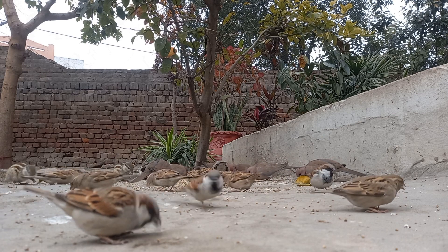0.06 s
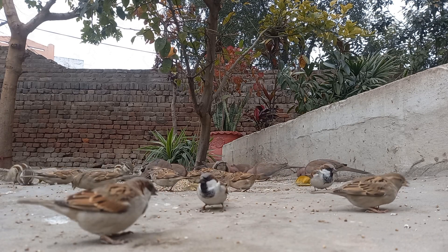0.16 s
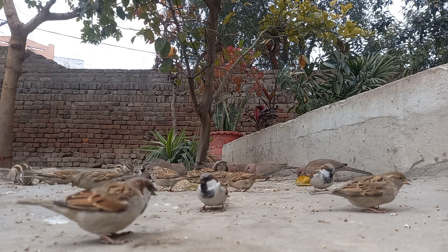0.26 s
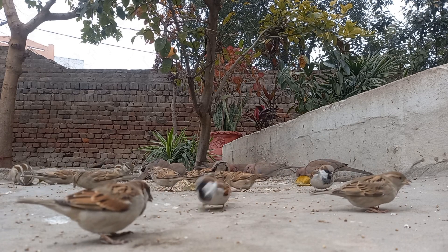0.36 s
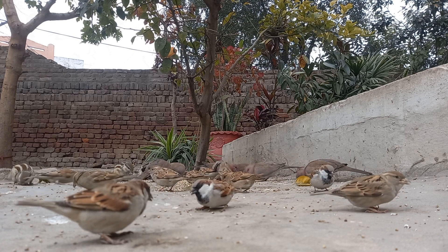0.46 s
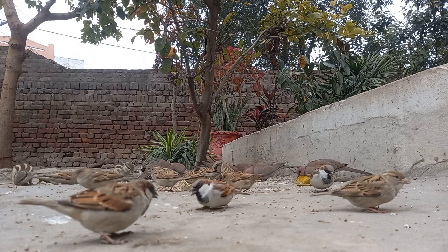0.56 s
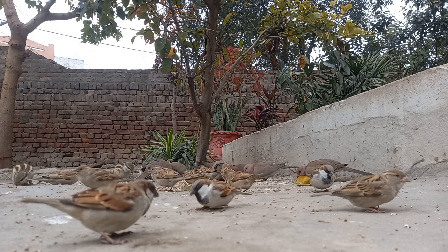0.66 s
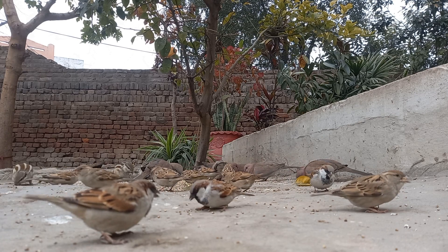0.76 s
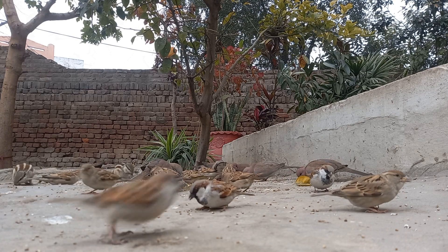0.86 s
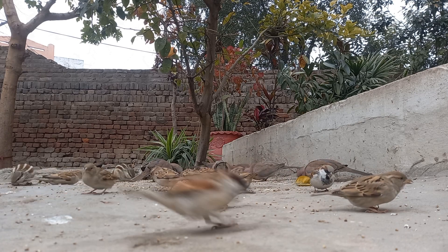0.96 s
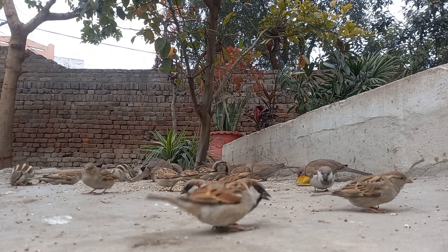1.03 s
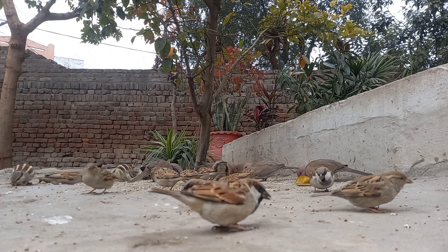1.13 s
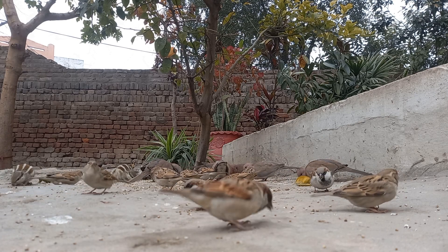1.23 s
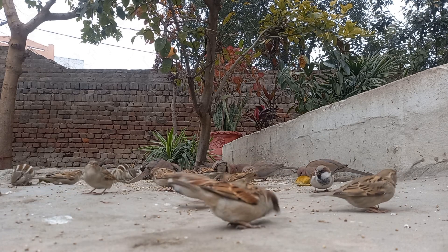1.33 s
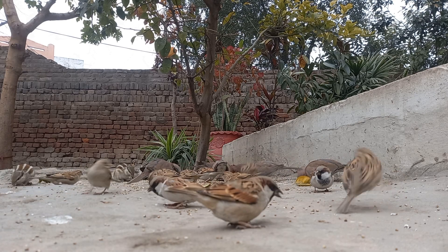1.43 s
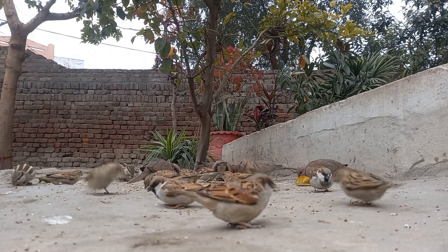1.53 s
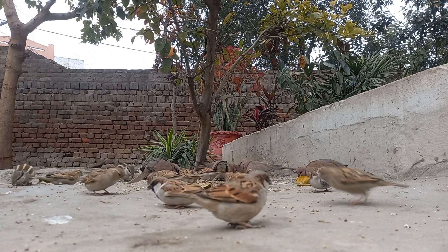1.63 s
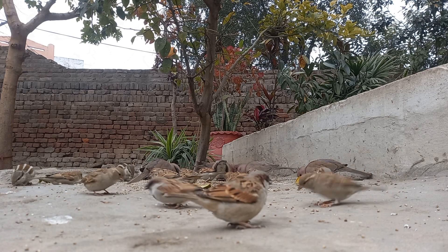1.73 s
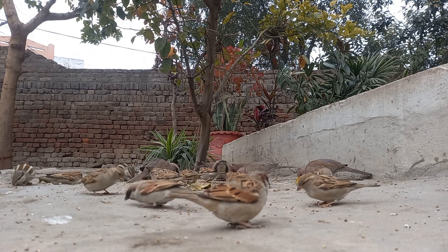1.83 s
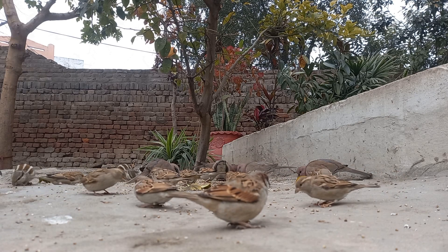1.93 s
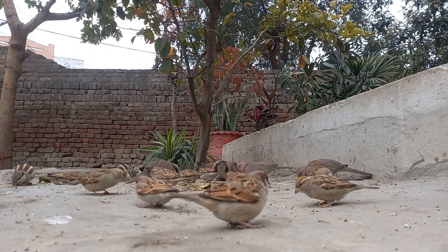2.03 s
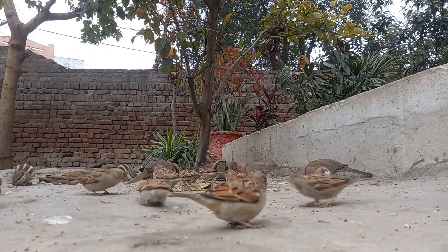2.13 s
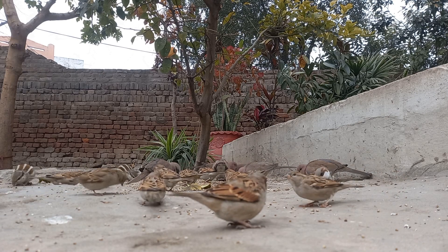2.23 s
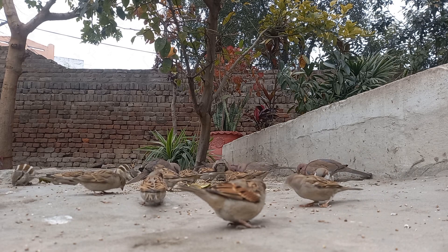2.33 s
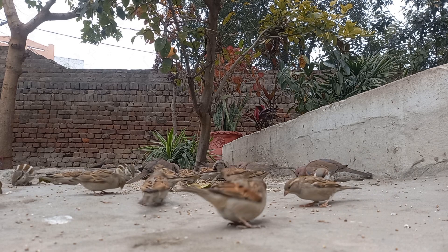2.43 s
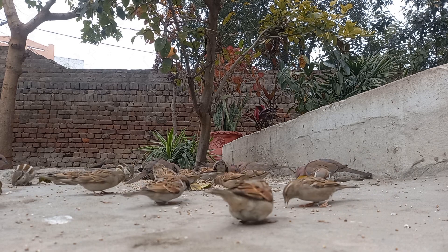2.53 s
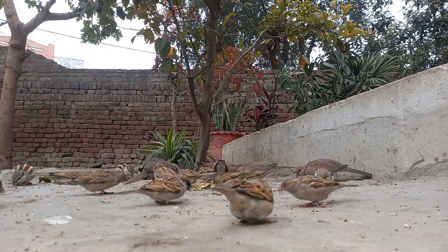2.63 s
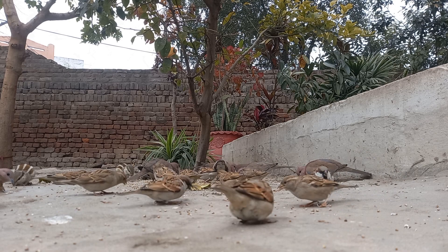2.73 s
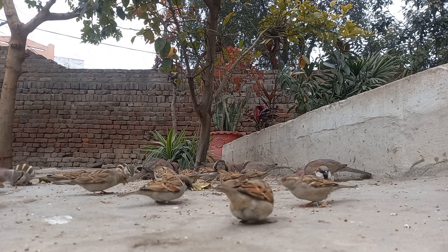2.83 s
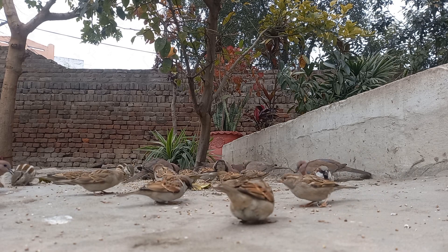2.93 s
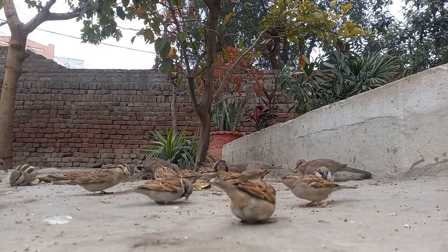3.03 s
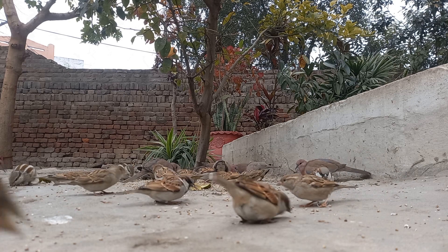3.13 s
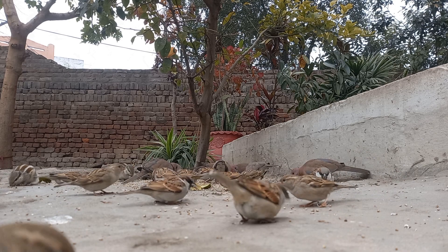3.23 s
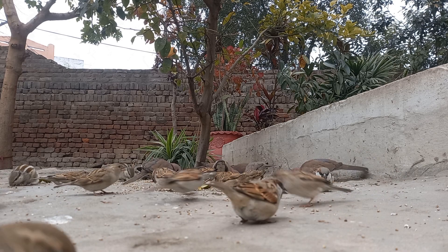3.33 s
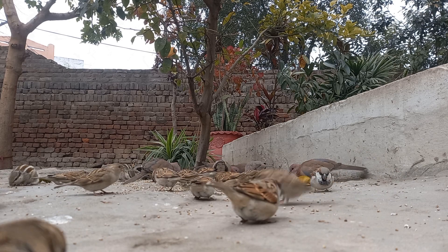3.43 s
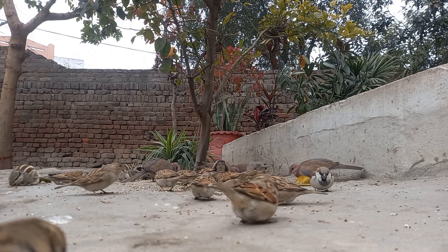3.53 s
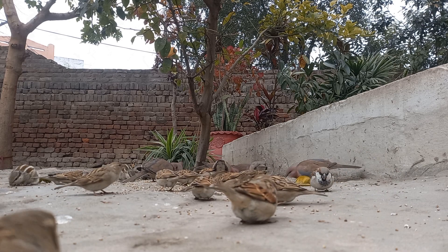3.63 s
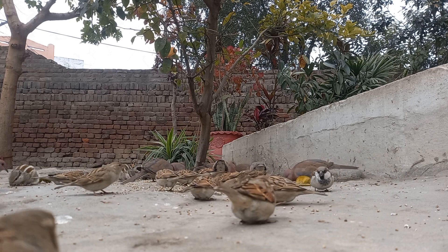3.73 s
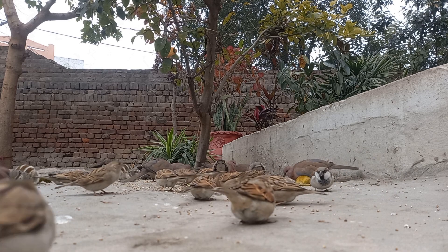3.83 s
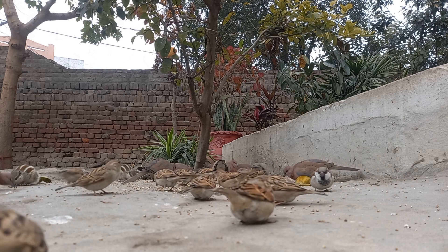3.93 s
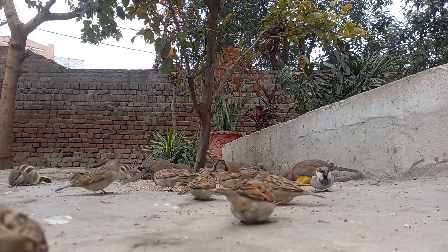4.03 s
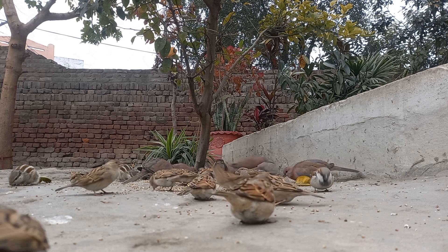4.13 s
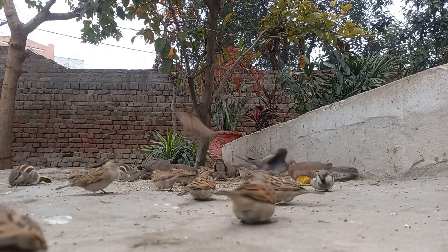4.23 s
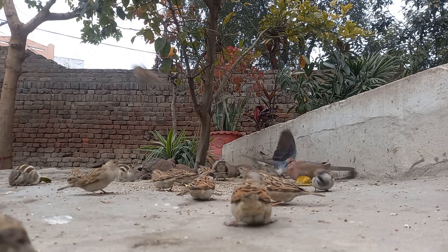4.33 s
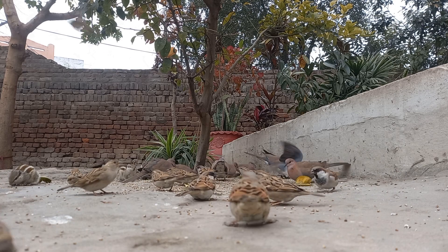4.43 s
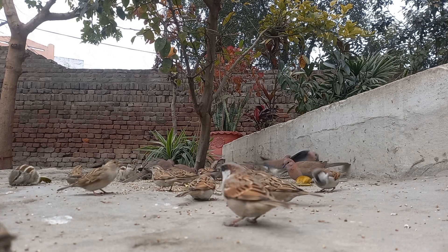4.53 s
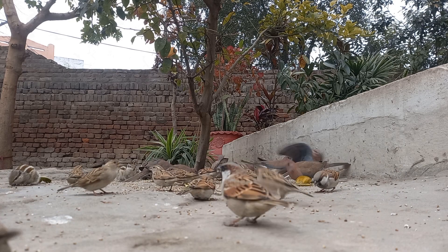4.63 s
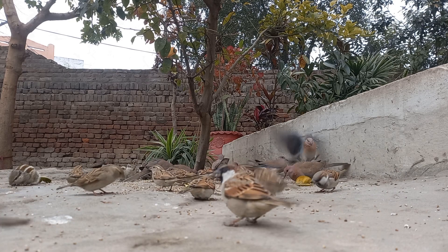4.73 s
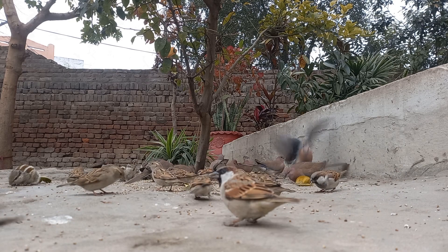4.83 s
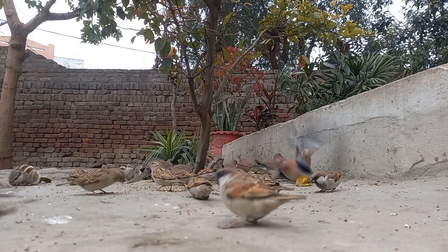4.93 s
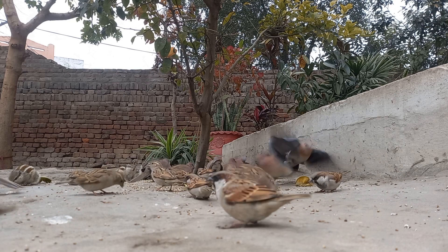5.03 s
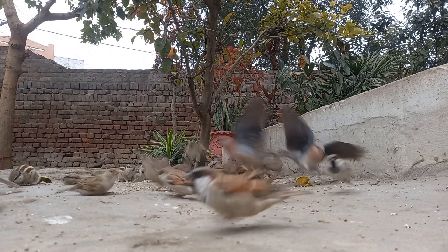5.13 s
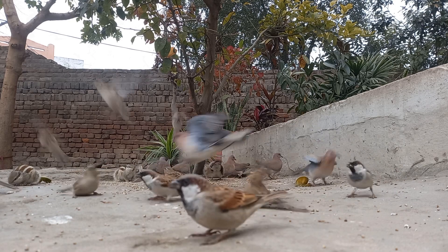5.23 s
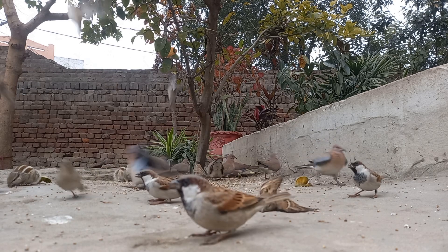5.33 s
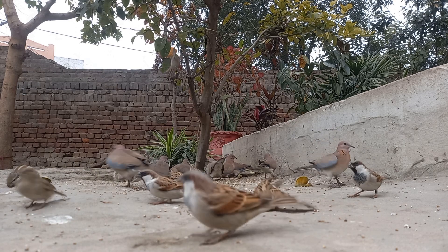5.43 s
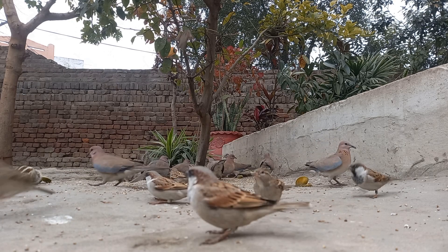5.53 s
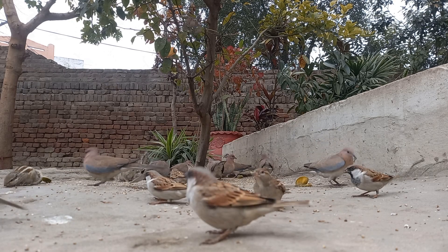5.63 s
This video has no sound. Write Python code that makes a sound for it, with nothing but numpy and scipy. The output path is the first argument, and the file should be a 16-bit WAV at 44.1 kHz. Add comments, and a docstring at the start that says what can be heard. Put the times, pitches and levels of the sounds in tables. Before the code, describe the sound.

Sparrows peck seed on a concrete courtyard, close to a microphone on the ground and mostly to the left. Sharp, irregular beak clicks and husk cracks run throughout over faint outdoor air. Brief chirps come at the start and around 1.4 seconds, with faint coos and raspy bird cries lightly echoing off the walls. Soft distant swishes drift by during the first two seconds and again from about 2.5 to 3.7. A larger bird gives a rising nasal call at 2.1 seconds, then a quick cluck. The pecking thins and claws scratch grit around 4 seconds. From 4.3 seconds doves take off nearby: rapid wingbeats clap and thump, feathers rustle, and gusts buffet the microphone with a low rumble. A coo and short low grunt come near 4.9 seconds. The flapping is loudest from 5.1 to 5.4, scattering seed, and continues to the end at about 5.6.

```python
"""A concrete courtyard, microphone on the ground. Sparrows peck seed right beside it: beak clicks,
cracking husks, claws on grit. Birds chirp, coo and rasp in the trees, gliding tones thrown back by
the walls, and a few distant swishes drift over. Near the end doves take off close by: wingbeats clap
and buffet the microphone, feathers rustle and seed scatters."""
import sys
import numpy as np
from scipy import signal
from scipy.fft import rfft, irfft, next_fast_len
from scipy.io import wavfile
from scipy.ndimage import uniform_filter1d, map_coordinates

SR = 44100
rng = np.random.default_rng(int(sys.argv[2]) if len(sys.argv) > 2 else 0)


def to_wav(sig):
    """Store sig (one row per channel, or 1-D mono) as 16-bit WAV at the path in sys.argv[1].

    Samples outside -1..1 are clipped; the rate is SR.
    """
    pcm = np.clip(np.atleast_2d(sig), -1, 1) * 32767
    pcm = np.round(pcm).astype(np.int16)
    wavfile.write(sys.argv[1], SR, pcm.T)  # frames by channels


N = 249606
TIME = np.arange(N) / SR
FADE_DB = 20  # drop over a swell's rise or fall, or a call's fade

# outdoor air: time_s, level_db
AIR_LEVELS = [(0, -59.5), (0.3, -60), (0.9, -59), (2.0, -57), (2.3, -57), (3.2, -62), (4.0, -63.5),
              (5.6, -47.5)]
# air puffs on the microphone: peak_s, rise_s, fall_s, level_db
AIR_PUFFS = [(1.91, 0.1, 0.16, -47), (2.34, 0.072, 0.047, -60.5), (3.56, 0.095, 0.069, -49)]
# distant swishes: peak_s, rise_s, fall_s, level_db, drift_octaves_per_s
FAR_SWISHES = [(0.302, 0.19, 0.17, -39, -.3), (0.93, 0.32, 0.17, -45.5, -.3), (1.61, 0.15, 0.13, -37.5, -1),
               (2.831, 0.39, 0.34, -38, .35), (3.504, 0.27, .23, -34, .15),
               (3.03, 0.072, 0.21, -47.5, 0.27)]
# resonances, one list per swish: centre_hz, width_hz, gain_db
SWISH_RESONANCES = [
    [(302, 280, 17), (845, 365, 19.5), (1710, 1760, 8.5), (5960, 250, -12)],
    [(597, 485, 6), (1700, 580, 5), (5700, 860, -0.5)],
    [(1360, 170, 12), (2400, 1700, 11), (4220, 2100, 17.5), (5670, 840, 14.5)],
    [(1560, 280, 1), (2930, 1650, 24), (3620, 340, 13), (4650, 2100, -13.5), (5730, 930, 17.5)],
    [(1610, 370, 6), (2260, 330, 16.5), (3180, 1150, 20.5), (4730, 350, 2), (5790, 990, 10)],
    [(2750, 400, -9), (4320, 1300, 5)],
]
# harsh cries: peak_s, rise_s, fall_s, level_db, pitch_hz, glide_hz_per_s, width_hz, left_db
CRIES = [(.165, 0.056, 0.12, -48, 2557, -7000, 650, 14), (.81, 0.095, 0.041, -50, 706, 400, 119, 7),
         (.94, .13, 0.16, -46, 768, -400, 149, 5), (1.62, 0.11, 0.084, -36.5, 1406, -1500, 172, 10.5),
         (1.74, .14, 0.11, -47.5, 4290, 3499, 424, 8)]
# harmonics, one list per cry, fundamental first: gain_db
CRY_HARMONICS = [
    [0, -8],
    [-12, 1, -5, -0.5, -7],
    [1, 1, -14, -2.5, -11, -16, -3.5],
    [-8, -5, 2.5, -8],
    [0],
]
# dove coos: start_s, length_s, level_db, first_hz, last_hz, left_db
DOVE_COOS = [(0.435, 0.26, -55.5, 811, 722, 6), (0.779, 0.21, -45.5, 640, 646, -17),
             (0.999, 0.26, -56.5, 625, 590, -18), (1.327, 0.18, -64.5, 590, 591, -21),
             (2.731, 0.11, -56, 414, 410, 2), (2.887, 0.11, -61.5, 417, 423, 9),
             (3.646, 0.3, -58, 373, 377, -7), (3.887, 0.058, -60, 421, 448, -7),
             (3.931, 0.081, -63, 679.5, 677, -18.5), (4.67, 0.2, -45.5, 463.7, 457, 2),
             (4.861, 0.2, -35, 440.2, 439.5, -1.5)]
# chirps: start_s, rise_s, fade_s, level_db, first_hz, last_hz, glide_s, octave_db, roughness, left_db
SPARROW_CHIRPS = [(0.123, 0.014, 0.055, -40.5, 3330, 1687, 0.089, -1.5, 0.01, -3),
                  (.18, 0.012, 0.23, -46, 2200, 1883, 0.024, -47, 0.022, 24),
                  (1.325, 0.012, 0.011, -41.5, 2700, 4770, 0.008, -27, 0.07, 12),
                  (1.359, 0.044, 0.027, -30, 4850, 2710, .031, -25, 0.01, 3),
                  (1.42, 0.032, 0.053, -40, 3015, 3270, 0.0554, -14, 0.04, 10),
                  (2.25, 0.037, 0.97, -55, 3800, 3360, 0.33, -46, .012, 16)]
# larger bird's rising call: time_s, pitch_hz, level_db
NASAL_CONTOUR = [(2.064, 855, -49.5), (2.099, 1049, -41), (2.137, 1139, -28), (2.156, 1120, -35),
                 (2.195, 1197, -38.5), (2.246, 1260, -52.5), (2.379, 1250, -65)]
# its falling cluck: start_s, rise_s, fade_s, level_db, first_hz, last_hz, glide_s
BIRD_CLUCKS = [(2.449, 0.004, 0.0096, -29, 1114, 686, 0.0065)]
# claws on concrete: peak_s, rise_s, fall_s, level_db
CLAW_SCRATCHES = [(0.1, 0.0024, 0.027, -37.5), (1.848, 0.075, 0.072, -42), (3.93, 0.013, 0.038, -53.5),
                  (4.057, 0.017, 0.025, -46.5), (4.096, 0.019, 0.015, -46.5), (4.149, 0.014, 0.023, -46.5),
                  (4.198, 0.015, 0.023, -53), (4.264, 0.019, 0.016, -43)]
# seed blown by the wings: peak_s, rise_s, fall_s, level_db
SEED_SPRAYS = [(4.857, 0.013, 0.042, -36.5), (5.137, .022, 0.022, -22.5), (5.38, 0.03, 0.034, -40)]
# feather flurries: peak_s, rise_s, fall_s, hiss_db, rush_db
FEATHER_FLURRIES = [(4.266, 0.028, 0.097, -40, -52.5), (4.328, 0.053, 0.35, -40, -29.5),
                    (4.489, 0.13, 1, -49, -40), (4.794, 0.025, 0.13, -36.5, -35.5),
                    (4.858, 0.016, 0.24, -37.5, -35.5), (5.021, 0.1, 0.43, -31, -35),
                    (5.131, 0.0078, 0.014, -23, -36.5), (5.14, 0.0048, 0.041, -26.5, -29),
                    (5.33, 0.26, 0.41, -33.5, -27)]
# hollow bumps, and a dove's short low grunt (last row): start_s, level_db, pitch_hz, width_hz
BUMPS_AND_GRUNT = [(2.009, -41, 1300, 200), (2.323, -35, 1320, 400), (2.329, -42, 856, 300),
                   (3.244, -37.5, 910, 500), (4.921, -15, 432, 46)]
# dove wing strokes: time_s, clap_db, clap_hz, thump_db, gust_db
WING_STROKES = [(4.276, -25.5, 734, -31.5, -20.5), (4.318, -23, 604, -17, -14.5),
                (4.324, -17, 930, -30.5, -35), (4.359, -24, 740, -19, -19), (4.368, -27.5, 1080, -26, -46),
                (4.401, -21, 686, -14.5, -19), (4.445, -29, 640, -26, -18), (4.488, -23.5, 500, -23, -16),
                (4.531, -24, 450, -16, -18), (4.572, -32, 430, -41, -18.5), (4.618, -29, 470, -28, -19),
                (4.665, -39, 710, -27, -24.5), (4.708, -32, 450, -27, -25.5), (4.754, -31.5, 477, -27, -26),
                (4.784, -17.5, 1240, -21, -23.5), (4.858, -22, 910, -33, -24.5),
                (4.878, -17.5, 1560, -39, -21), (4.955, -20, 450, -20.5, -42.5),
                (5.008, -22.5, 640, -23, -30), (5.1119, -5, 1173, -8.5, -42.5),
                (5.1398, -22, 624, -2.5, -13), (5.175, -21, 700, -19.5, -27),
                (5.2036, -12.5, 1080, -36, -24.5), (5.228, -22.5, 690, -28, -27),
                (5.249, -28, 950, -34.5, -30), (5.272, -15, 900, -23, -15), (5.313, -9, 633, -10.5, -17),
                (5.333, -28, 700, -22, -15.5), (5.358, -20, 700, -20, -14), (5.402, -18, 596, -13.5, -11.5),
                (5.444, -19.5, 560, -14, -21), (5.488, -46, 500, -16, -13), (5.532, -28.5, 500, -25, -13.5),
                (5.58, -38, 450, -22, -20), (5.624, -35, 448, -29, -16.5)]
# beak taps and cracking husks: start_s, level_db, centre_hz, edge_db
BEAK_TAPS = [(.171, -15.5, 5720, -17), (.191, -24, 5760, -45), (.251, -17, 6220, -58),
             (.279, -23.5, 5540, -50), (.2924, -15, 5600, -18), (.3203, -19, 5570, -8.5),
             (.3535, -23.5, 6350, -20), (.403, -19.5, 6060, -27), (.531, -32, 5240, -55),
             (.59, -35.5, 5400, -28.5), (.616, -29, 4600, -55), (.6324, -18.5, 4940, -60),
             (.65, -19.5, 5130, -30), (.662, -30, 5160, -50), (.7447, -5.5, 5340, -24),
             (.7986, -13.5, 5540, -46), (.9207, -19, 5900, -22), (.9743, -19, 4600, -60),
             (1.0549, -17.5, 5530, -21), (1.0955, -25, 5430, -55), (1.1933, -22.5, 5900, -57),
             (1.305, -19.5, 5820, -68), (1.389, -24.5, 5450, -35), (1.403, -20.5, 5330, -50),
             (1.471, -25.5, 4700, -54), (1.645, -19, 5470, -49), (1.5122, -17, 5620, -12),
             (1.6812, -12.5, 5000, -18), (1.6888, -5.5, 5460, -11), (1.689, -12.5, 2700, -50),
             (1.744, -29, 5200, -57), (1.758, -19, 5050, -62), (1.8166, -24.5, 5100, -58),
             (1.9039, -20, 5960, -52), (1.916, -21.5, 5000, -5), (1.9165, -7, 2750, -21),
             (2.0175, -22, 5450, -30), (2.043, -29.5, 6230, -39), (2.2284, -25, 5910, -52),
             (2.3099, -25, 2160, -21), (2.3303, -21.5, 2880, -50), (2.4478, -16, 5530, -14),
             (2.4627, -23, 6050, -45), (2.5433, -17.5, 4400, -6), (2.6497, -18, 5850, -39),
             (2.8205, -23.5, 4400, -61), (2.8734, -16.5, 6170, -55), (2.8826, -14, 3650, -60),
             (2.9183, -20, 5550, -10), (3.2362, -16.5, 3600, -58), (3.2423, -17, 3600, -55),
             (3.2469, -15.5, 4470, -8.5), (3.6625, -24.5, 5580, -30), (3.7678, -28.5, 5300, -62),
             (3.933, -33, 3270, -50), (3.948, -27, 4560, -55), (4.3178, -16.5, 2100, -38),
             (4.6484, -24.5, 4500, -54), (4.6617, -21, 5570, -50), (4.8569, -15, 2610, -9),
             (5.0099, -9, 5430, -43), (5.028, -11, 3800, -45), (5.0792, -11.5, 4100, -45),
             (5.1298, -7.5, 4130, -18), (5.1405, -21, 5780, -21), (5.3304, -4.5, 2990, -50),
             (5.331, -14, 5200, -50), (5.39, -20.5, 5810, -34), (5.453, -16.5, 5610, -49),
             (5.54, -23, 5620, -50), (5.574, -19, 5050, -48)]

# spectra: frequency_hz, gain_db
AIR_EQ = [(25, -37.5), (55, -10.5), (85, 11.5), (115, 3.5), (170, 3.5), (300, 1), (600, -1), (1000, -5),
          (2500, -2.5), (4500, -11), (6000, 3.5), (8000, -28.5), (16000, -12.5)]
GRIT_EQ = [(300, 1), (1000, 4), (3000, 4), (5800, 17), (16000, -38)]
SEED_EQ = [(2000, -22), (6000, -0.5), (11000, -4), (16000, -6)]
FEATHER_EQ = [(500, 7), (1200, 12.5), (2200, 8), (3200, 2.5), (4200, -0.5), (6000, 6), (8000, -11),
              (11000, -13), (16000, -18.5)]
RUSH_EQ = [(30, -6), (70, 5.5), (200, 13), (500, 3), (900, -3), (1500, -27), (2500, -36), (6000, -56)]
SLAP_EQ = [(150, -11.5), (400, -12), (900, 7), (1600, -15), (3000, -11), (8000, -14)]
MICROPHONE_EQ = [(25, -16), (60, 1.5), (6300, 1.5), (6700, -2.5), (7150, -17.5), (8200, -22.5),
                 (10500, -13), (13500, -27.5), (14700, -0.5), (15400, 9), (16200, -33)]
PUFF_EQ = [(25, -46), (55, -12.5), (80, 1), (120, -3.5), (220, -25.5), (600, -45), (3000, -43.5)]
SWISH_BODY_EQ = [(4400, 0), (5600, -30), (7000, -60)]
SWISH_LEFT_EQ = [(1000, -.59), (3000, -2.34), (6000, 2.7)]
SWISH_RIGHT_EQ = [(1000, 0), (3000, -3.5), (6000, -14)]
GUST_EQ = [(25, -40), (48, -24), (62, 3), (135, 1.5), (170, -18.5), (230, 5), (400, 3.5)]
PECK_EQ = [(300, -22), (1100, -9.5), (1800, 3.5), (16000, 3.5)]  # tiny things radiate little bass


def gain_of(db):
    """Decibels to gain."""
    return 10 ** (np.asarray(db) / 20)


def unit_rms(x):
    """Scales to rms 1."""
    return x / np.sqrt(np.mean(x ** 2) + 1e-20)


def add(mix, start_s, sound):
    """Mixes a sound in at start_s."""
    part = mix[max(round(start_s * SR), 0):][:len(sound)]
    part += sound[:len(part)]


def coloured(x, eq):
    """Filters by a spectrum, interpolated over log frequency."""
    hz, db = np.transpose(eq)
    size = next_fast_len(N + SR // 4)
    curve_db = np.interp(np.log(np.fft.rfftfreq(size, 1 / SR) + 1), np.log(hz), db)
    return irfft(rfft(x, size) * gain_of(curve_db), size)[..., :N]


def wander(cutoff_hz):
    """Low-passed noise, rms 1."""
    size = next_fast_len(N)
    lowpass = np.exp(-(np.fft.rfftfreq(size, 1 / SR) / cutoff_hz) ** 2)
    return unit_rms(irfft(rfft(rng.standard_normal(size)) * lowpass, size)[:N])


def swell(peak_s, rise_s, fall_s):
    """Round-topped envelope, 1 at peak_s."""
    away = np.maximum((peak_s - TIME) / rise_s, (TIME - peak_s) / fall_s)
    return gain_of(-FADE_DB * np.minimum(abs(away), 10) ** 1.8)


def swells(rows):
    """Sum of swells, each at its own level."""
    return sum(gain_of(db) * swell(*shape) for *shape, db in rows)


def flicker(x, depth_db, frame_samples, frames):
    """Random gain in time-frequency patches, four bins wide."""
    bins = signal.stft(x, nperseg=frame_samples)[2]
    patches = uniform_filter1d(rng.standard_normal(bins.shape[1:]), size=4, axis=0)
    patches = unit_rms(uniform_filter1d(patches, size=frames, axis=1))
    return signal.istft(bins * gain_of(depth_db * patches), nperseg=frame_samples)[1][:, :N]


def blip(hz, width_hz, grit=0.):
    """Brief ring that swells and dies; grit makes its pitch stray."""
    t = np.arange(int(4 * SR / width_hz)) / SR
    age = np.pi * width_hz * t
    stray = uniform_filter1d(rng.standard_normal(len(t)), len(t) // 12 + 1)
    smear = grit * np.cumsum(stray) * np.sqrt(width_hz / SR)
    return (age * np.exp(1 - age)) ** 3 * np.cos(2 * np.pi * (hz * t + rng.random()) + smear)


def hoarse(hz, width_hz):
    """Partial smeared into a band by straying amplitude and phase."""
    phase = 2 * np.pi * np.cumsum(hz) / SR
    return wander(width_hz) * np.cos(phase) + wander(width_hz) * np.sin(phase)


def panned(x, left_db):
    """Constant-power pan, left over right by left_db."""
    pair = gain_of([[left_db / 2], [-left_db / 2]])
    return x * pair / np.sqrt(np.mean(pair ** 2))


def near(x, left_db, lag_ms):
    """Close source: weaker and later at the far microphone port."""
    return np.array([x, gain_of(-left_db) * np.interp(TIME - lag_ms / 1000, TIME, x)])


def echoes(x, t60_s, taps_per_s=2500):
    """Sparse reflections off brick and concrete, different at each port."""
    t = TIME[:SR]
    taps = rng.standard_normal((2, SR)) * (rng.random((2, SR)) < taps_per_s / SR)
    taps *= (t > .008) * gain_of(-60 * t / t60_s)
    taps /= np.linalg.norm(taps, axis=1, keepdims=True)
    return signal.fftconvolve(x[None], taps, axes=1)[:, :N]


def outdoors(voice, left_db, wet_db, lag_ms=0., t60_s=.48):
    """Voice from one side, thrown back by the walls."""
    direct = panned(near(voice, 0, lag_ms), left_db)
    return direct + panned(gain_of(wet_db) * echoes(voice, t60_s), left_db / 2)


def yard_air():
    """Faint outdoor air, with soft low puffs on the microphone."""
    air = unit_rms(coloured(rng.standard_normal(N) + 1.58 * rng.standard_normal((2, N)), AIR_EQ))
    air *= gain_of(np.interp(TIME, *np.transpose(AIR_LEVELS)) + wander(2.6))
    puffs = unit_rms(coloured(rng.standard_normal(N), PUFF_EQ))
    breeze = gain_of(-68.5) + swells(AIR_PUFFS)
    return panned(air, left_db=1.5) + panned(puffs * breeze, left_db=4.5)


def swishes(floor_db=-23, grain_db=2.3):
    """Distant rasping strokes: grainy noise in a few resonances, the lower ones drifting."""
    size = next_fast_len(N)
    hz, out = np.fft.rfftfreq(size, 1 / SR), np.zeros((2, N))
    for (peak_s, rise_s, fall_s, level_db, drift), bands in zip(FAR_SWISHES, SWISH_RESONANCES):
        shape = sum(gain_of(db) * np.exp(-2 * ((hz - centre) / width) ** 2)
                    for centre, width, db in bands)
        shape += gain_of(floor_db) * hz / (hz + 600)
        low_cut_hz = .15 * bands[0][0]
        shape /= np.sqrt(1 + (low_cut_hz / (hz + 1)) ** 6)
        scrape = rng.standard_normal((2, N)) * gain_of(grain_db * wander(84))
        scrape = unit_rms(irfft(rfft(scrape, size) * shape, size)[:, :N])
        body = coloured(scrape, SWISH_BODY_EQ)
        read_at = np.cumsum(2 ** (drift * np.clip(TIME - peak_s, -.5, .5))) % (N - 1)
        drifted = np.array([map_coordinates(port, [read_at], order=3) for port in body])
        out += (scrape - body + drifted) * gain_of(level_db) * swell(peak_s, rise_s, fall_s)
    out = flicker(out, depth_db=3, frame_samples=1024, frames=7)
    out += gain_of(-2.5) * echoes(out.mean(0), t60_s=.05)
    return np.array([coloured(out[0], SWISH_LEFT_EQ), coloured(out[1], SWISH_RIGHT_EQ)])


def harsh_cries():
    """Birds rasping in the trees: gliding stacks of hoarse harmonics."""
    out = np.zeros((2, N))
    for cry, harmonics_db in zip(CRIES, CRY_HARMONICS):
        peak_s, rise_s, fall_s, level_db, hz, glide_hz_per_s, width_hz, left_db = cry
        pitch_hz = hz + glide_hz_per_s * np.clip(TIME - peak_s, -2 * rise_s, 2 * fall_s)
        stack = sum(gain_of(db) * hoarse(k * pitch_hz, width_hz * np.sqrt(k))
                    for k, db in enumerate(harmonics_db, 1))
        voice = unit_rms(stack) * gain_of(level_db) * swell(peak_s, rise_s, fall_s)
        out += outdoors(voice, left_db, wet_db=-5, t60_s=.069)
    return out


def dove_coos():
    """Each coo: one soft, husky arch of level on a sliding pitch."""
    out = np.zeros((2, N))
    for start_s, length_s, db, first_hz, last_hz, left_db in DOVE_COOS:
        progress = np.clip((TIME - start_s) / length_s, 0, 1)
        husky = hoarse(first_hz + (last_hz - first_hz) * progress, width_hz=first_hz * .065)
        out += outdoors(gain_of(db) * np.sin(np.pi * progress) ** 2 * husky, left_db, wet_db=-1)
    return out


def chirp(start_s, rise_s, fade_s, level_db, first_hz, last_hz, glide_s, octave_db, roughness):
    """Whistled note plus its octave; the unsteady pitch glides and settles, the level wavers."""
    t, voice = np.arange(0, rise_s + 2 * fade_s, 1 / SR), np.zeros(N)
    fall_db = FADE_DB * (np.maximum(t - rise_s, 0) / fade_s) ** 1.28
    waver_db = 4 * np.minimum(t / .1, 1) * wander(25)[:len(t)]
    envelope = np.minimum(t / rise_s, 1) ** .8 * gain_of(level_db - fall_db + waver_db)
    hz = last_hz + (first_hz - last_hz) * np.exp(-t / glide_s)
    phase = 2 * np.pi * np.cumsum(hz * (1 + roughness * wander(143)[:len(t)])) / SR
    tone = np.sin(phase) + gain_of(octave_db) * np.sin(2 * phase)
    add(voice, start_s, np.sqrt(2) * envelope * tone)
    return voice


def nasal_call(overtones_db=(-14, -15, -16, -22.5, -19), brightening_db_per_db=.088):
    """Rising cry, richest in overtones where loudest."""
    time_s, hz, db = np.transpose(NASAL_CONTOUR)
    level_db = np.interp(TIME, time_s, db)
    pitch_hz = np.interp(TIME, time_s, hz) * (1 + .006 * wander(40) + .012 * wander(350))
    phase = 2 * np.pi * np.cumsum(pitch_hz) / SR
    overtones = sum(gain_of(partial_db + 4 * wander(110)) * np.sin(k * phase)
                    for k, partial_db in enumerate(overtones_db, 2))
    tone = np.sin(phase) + overtones * gain_of(brightening_db_per_db * (level_db - db.max() - 9) - 1)
    return np.sqrt(2) * tone * gain_of(level_db) * (TIME > time_s[0]) * (TIME < time_s[-1])


def bird_calls():
    """Sparrows chirp nearby; a larger bird calls and clucks further off."""
    chirps = sum(outdoors(chirp(*note), left_db, wet_db=-1, t60_s=.46)
                 for *note, left_db in SPARROW_CHIRPS)
    cluck = sum(chirp(*note, octave_db=-22, roughness=.17) for note in BIRD_CLUCKS)
    return (chirps + outdoors(nasal_call(), left_db=5.5, wet_db=0, lag_ms=.37)
            + outdoors(cluck, left_db=3.5, wet_db=-7, lag_ms=.16, t60_s=.17))


def claw_scratches(grains_per_s=2500):
    """Claws drag over grit: short, dense showers of tiny clicks."""
    grains = rng.standard_normal(N) * (rng.random(N) < grains_per_s / SR)
    scrape = unit_rms(coloured(grains, GRIT_EQ)) * swells(CLAW_SCRATCHES)
    walls = gain_of(-12.5) * echoes(scrape, t60_s=.082)
    return near(scrape, left_db=16, lag_ms=.081) + panned(walls, left_db=9)


def seed_sprays(grains_per_s=5000):
    """Seed scatters over concrete: a brief fizz of sharp clicks."""
    grains = rng.standard_normal((2, N)) * (rng.random(N) < grains_per_s / SR)
    return panned(unit_rms(coloured(grains, SEED_EQ)) * swells(SEED_SPRAYS), left_db=5)


def feather_rustle(throb_db=11):
    """Feathers hiss and air rushes, swelling with each stroke; sliding quills make the hiss flicker."""
    hiss_power = sum((gain_of(db - 2) * swell(*shape)) ** 2 for *shape, db, _ in FEATHER_FLURRIES)
    rush_power = sum((gain_of(db - 7) * swell(*shape)) ** 2 for *shape, _, db in FEATHER_FLURRIES)
    strokes = sum(np.exp(-((TIME - time_s - .003) / .008) ** 2) for time_s, *_ in WING_STROKES)
    throb = gain_of(throb_db * np.minimum(strokes, 1))
    noise = rng.standard_normal((2, N)) + .16 * rng.standard_normal(N)
    quills = flicker(noise, depth_db=2.6, frame_samples=512, frames=3)
    hiss = unit_rms(coloured(quills, FEATHER_EQ)) * np.sqrt(hiss_power * throb)
    air = rng.standard_normal(N) + .5 * rng.standard_normal((2, N))
    rush = unit_rms(coloured(air, RUSH_EQ)) * np.sqrt(rush_power) * throb
    return panned(hiss, left_db=6) + panned(rush, left_db=-3)


def bumps_and_grunt():
    """Hollow bumps, and a dove's short low grunt."""
    out = np.zeros(N)
    for start_s, db, hz, width_hz in BUMPS_AND_GRUNT:
        add(out, start_s, gain_of(db) * blip(hz, width_hz))
    return out


def wings(thump_hz=250, boom_hz=72, sweep_hz=170, sweep_s=.01342, boom_t60_s=.21):
    """Each downstroke claps, thumps, squeezes out a slap of air and sets the microphone booming."""
    direct = bumps_and_grunt()  # these share the wings' pan and echoes
    slaps, gusts, t = np.zeros(N), np.zeros(N), TIME[:SR // 4]
    # the microphone's low cut delays the deepest tones: each boom slides down and lingers
    cycles = np.cumsum(boom_hz + sweep_hz * np.exp(-t / sweep_s)) / SR
    boom = np.sin(2 * np.pi * cycles) * gain_of(-60 * t / boom_t60_s) * (1 - np.exp(-t / .0051))
    swing = 2 * np.pi * thump_hz * (t - t.mean())
    thump = -swing * np.exp((1 - swing ** 2) / 2)  # one pressure swing under the wing
    slap_envelope = np.minimum(t / .0025, 1) * np.exp(-t / .0065)
    for time_s, clap_db, clap_hz, thump_db, gust_db in WING_STROKES:
        add(direct, time_s - .001, gain_of(clap_db - 3) * blip(clap_hz, clap_hz * .28, grit=.86))
        add(direct, time_s - t.mean(), gain_of(thump_db - 5.5) * thump)
        add(gusts, time_s - .005, gain_of(gust_db - 1) * boom)
        add(slaps, time_s - .002, gain_of(clap_db - 23.5) * slap_envelope)
    direct += slaps * unit_rms(coloured(rng.standard_normal(N), SLAP_EQ))
    walls = gain_of(-14) * echoes(direct, t60_s=.2)
    return panned(coloured(gusts, GUST_EQ), left_db=1.5) + panned(direct, left_db=3) + walls


def pecks(sharp_hz=5690, sharp_width_hz=1663, ticks_per_s=26, lags_ms=(.04, .1, .25)):
    """Each beak strike: a sharp-edged click and its rebound. Husk ticks fill the gaps."""
    spots, edges = np.zeros((3, N)), np.zeros(N)  # three spots on the concrete
    t = np.arange(-SR // 100, SR // 100) / SR
    haze_envelope = np.exp(-abs(t - .001) / .003)  # brief noise around each click, softening its onset
    for k, (start_s, db, hz, edge_db) in enumerate(BEAK_TAPS):
        spot = spots[k % 3]
        # blunter taps are lower and wider; harder ones are cleaner
        width_hz = max(sharp_width_hz + .73 * (sharp_hz - hz), sharp_width_hz / 2)
        loose_db = db - .35 * max(db + 19, 0)
        add(spot, start_s, gain_of(db - 1) * blip(hz, width_hz * .6, grit=.8))
        add(edges, start_s, gain_of(edge_db + 5) * blip(22400, 8100))
        rebound_s = start_s + rng.uniform(.001, .003)
        add(spot, rebound_s, gain_of(loose_db - 16) * blip(hz, width_hz * .4, grit=3))
        haze = unit_rms(np.convolve(rng.standard_normal(len(t)), blip(hz, width_hz, grit=1), "same"))
        add(spot, start_s + t[0], gain_of(loose_db - 21) * haze * haze_envelope)
    for k, (when, size, pitch) in enumerate(rng.random((int(ticks_per_s * N / SR), 3))):
        tick = gain_of(-45 + 7 * size ** 3) * blip(4500 + 1800 * pitch, 1500, grit=2)
        add(spots[k % 3], when * N / SR, tick)
    spots = coloured(spots, PECK_EQ)
    direct = sum(near(spot, left_db=14, lag_ms=lag) for spot, lag in zip(spots, lags_ms))
    walls = gain_of(-17) * echoes(sum(spots) + edges, t60_s=.11)
    return direct + panned(edges, left_db=17.5) + panned(walls, left_db=9)


def scene():
    """Stereo sum of the courtyard's sources."""
    return (yard_air() + pecks() + claw_scratches() + bird_calls() + harsh_cries() + dove_coos()
            + swishes() + wings() + feather_rustle() + seed_sprays())


def record(dry):
    """Microphone, deaf above 7 kHz but for a narrow peak near 15 kHz; then the band limit."""
    band_limit = signal.firwin(511, 16900, window=("kaiser", 9), fs=SR)
    return signal.oaconvolve(coloured(dry, MICROPHONE_EQ), band_limit[None], "same")


dry = scene()
out = record(dry)
to_wav(out)
```